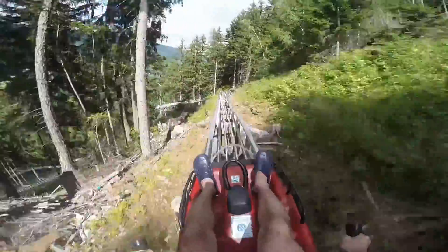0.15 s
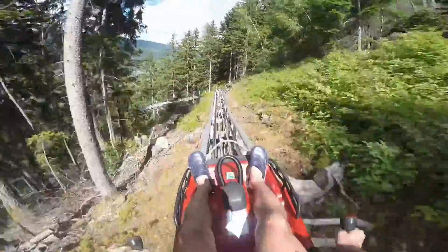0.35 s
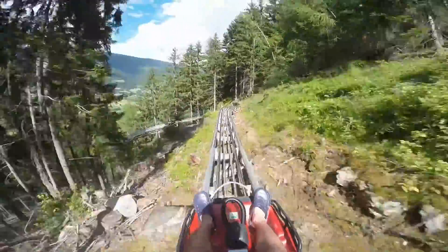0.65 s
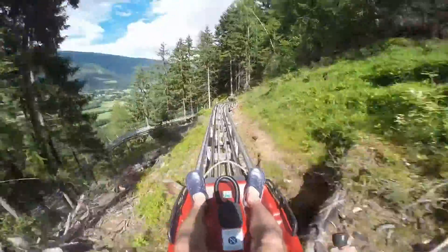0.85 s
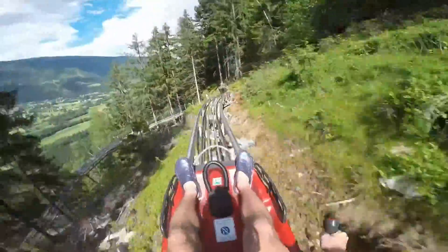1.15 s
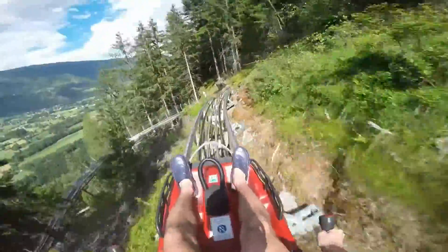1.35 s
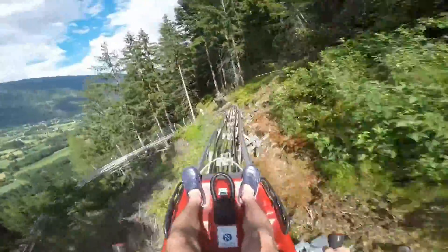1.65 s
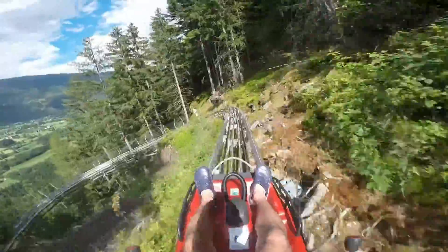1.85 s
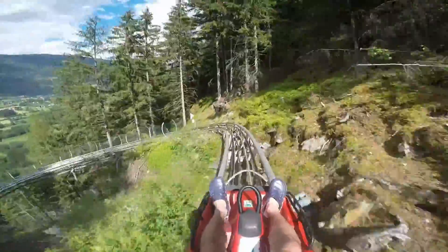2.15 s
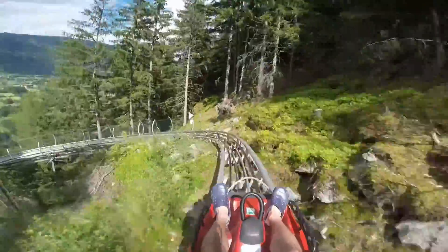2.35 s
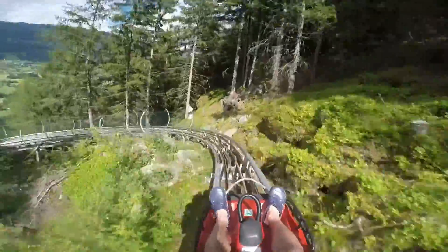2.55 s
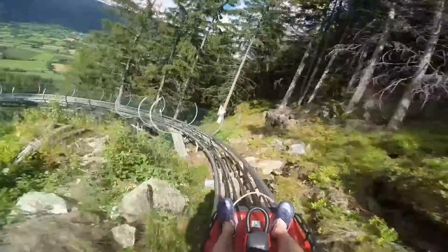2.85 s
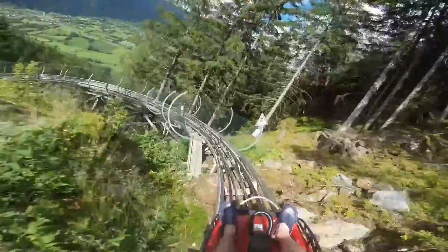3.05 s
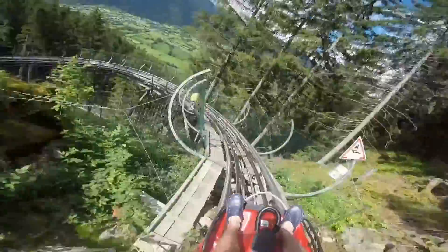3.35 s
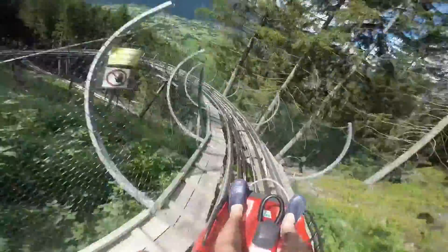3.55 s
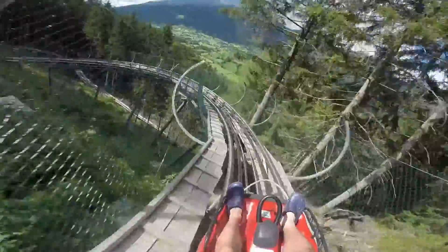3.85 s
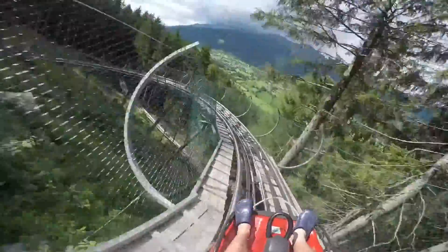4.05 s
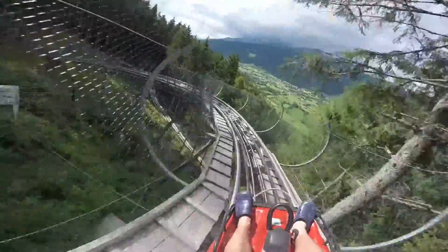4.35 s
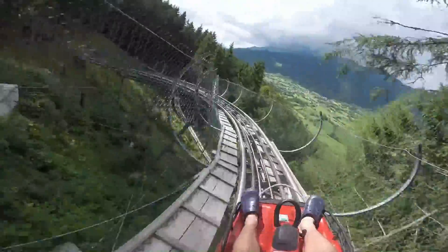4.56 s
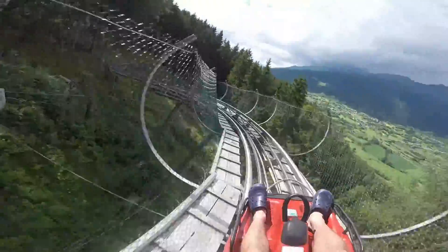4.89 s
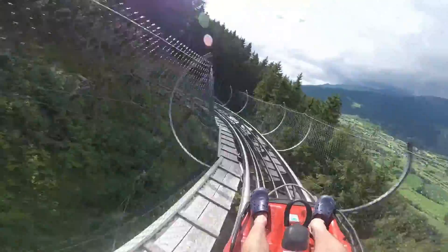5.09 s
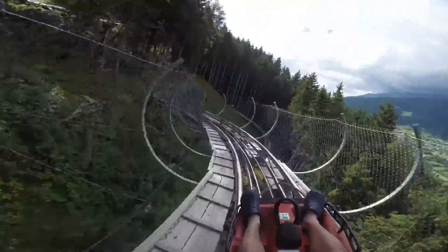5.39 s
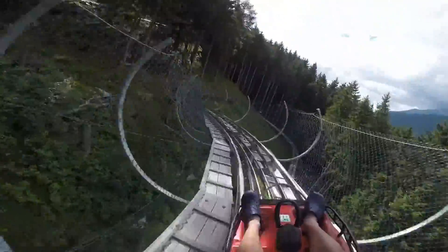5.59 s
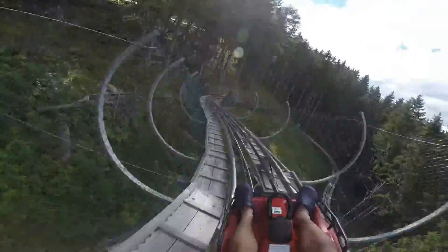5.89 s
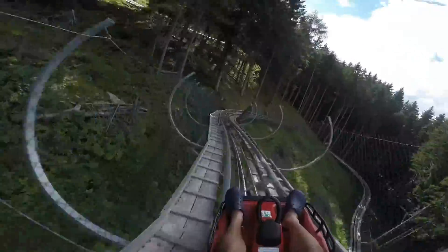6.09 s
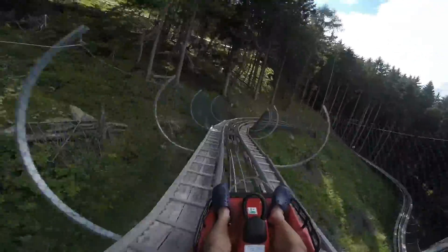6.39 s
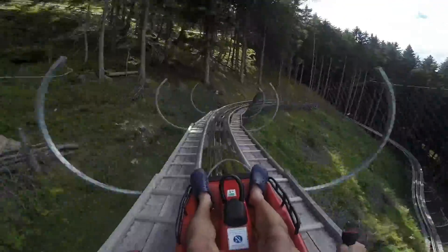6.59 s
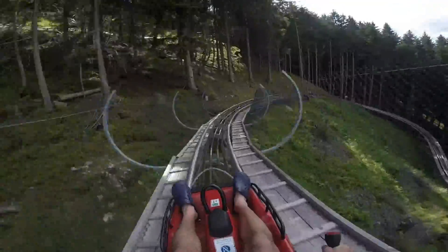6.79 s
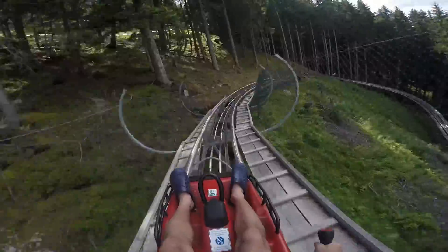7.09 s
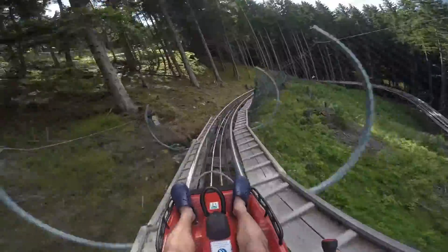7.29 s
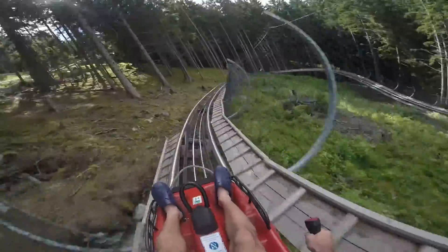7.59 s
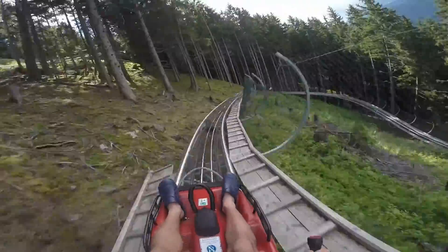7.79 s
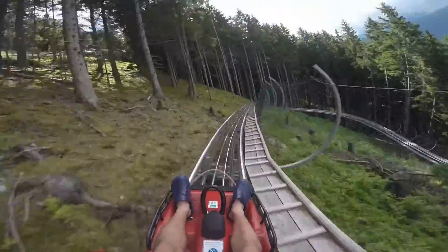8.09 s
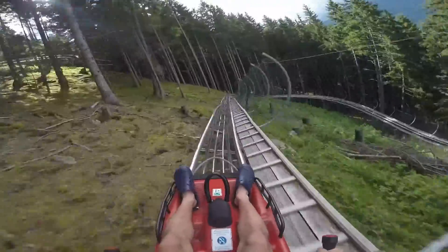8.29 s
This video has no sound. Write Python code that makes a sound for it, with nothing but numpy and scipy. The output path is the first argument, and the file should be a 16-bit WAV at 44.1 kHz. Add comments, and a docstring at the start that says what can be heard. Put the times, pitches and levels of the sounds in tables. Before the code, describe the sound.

Muffled onboard sound of a fast mountain coaster sled: steady gritty wheel roll, quick fluttering ticks, deep gusts thudding the case, scattered clacks and pings.

```python
"""Outdoors on a steel track, a sled rolls fast, heard by a small camera in a closed case on the rider.
Swelling low noise is wind on the case; the frame adds rumble, a drone and soft pushes for jolts.
The wheels are noise through resonances, with a tick each turn; knocks, pings and rattles are bursts
of noise. Squeaks and the camera's whine are sine tones, and faint clicks crackle in the treble."""
import sys
import numpy as np
from scipy import signal
from scipy.fft import rfft, irfft, next_fast_len
from scipy.io import wavfile
from scipy.ndimage import uniform_filter1d, minimum_filter1d, map_coordinates

SR = 44100
rng = np.random.default_rng(int(sys.argv[2]) if len(sys.argv) > 2 else 0)


def makeup_ratio(level_db):
    """Linear amplitude ratio for a level in decibels (20 dB per factor of ten)."""
    decades = np.asarray(level_db, float) / 20
    return 10 ** decades


def transcribe(u):
    """Save the signal u as a 16-bit wav file named by the first command-line argument.

    u: samples, shape (n,) or (channels, n), limited to [-1, 1]; the rate is SR.
    q: integer samples, one column per channel.
    """
    v = np.clip(np.atleast_2d(u).T, -1, 1)
    q = np.round(v * 32767).astype(np.int16)
    wavfile.write(sys.argv[1], SR, q)


N = 372204

# resonances of rail and case that colour rolling and knocks: centre_hz, width_hz, level_db
BODY_MODES = [(1234, 386, -1), (1660, 363, 2.5), (2400, 430, 0.5), (2990, 880, -6.5)]
# treble resonances that colour hiss, ticks and knocks: centre_hz, width_hz, level_db
BRIGHT_MODES = [(3450, 91, 6.5), (4370, 335, 5.5), (5810, 445, 6), (6780, 350, -2.5)]


def unit(x):
    """Scales a signal to rms 1."""
    return x / np.sqrt(np.mean(x ** 2) + 1e-20)


def curves(rows):
    """Draws straight lines between timed rows: one curve for each column after the time."""
    time_s, *columns = np.transpose(rows)
    return [np.interp(np.arange(N) / SR, time_s, column) for column in columns]


def wobble(rate):
    """A smooth random curve with rate knots a second."""
    knots = rng.standard_normal(int(N * rate / SR) + 4)
    return map_coordinates(knots, [np.arange(N) * rate / SR])


def follows(control_db, law):
    """The level of a layer that moves with a control."""
    over_db, share = law
    mean_db = control_db.mean()
    return mean_db + over_db + share * (control_db - mean_db)


def filtered(x, response):
    """Applies a complex response of frequency."""
    size = next_fast_len(len(x) + 8192)
    spectrum = rfft(x, size) * response(np.fft.rfftfreq(size, 1 / SR))
    return irfft(spectrum, size)[:len(x)]


def coloured(points, noise=None):
    """Shapes noise by a (Hz, dB) curve and scales it to rms 1."""
    point_hz, point_db = np.transpose(points)
    noise = rng.standard_normal(N) if noise is None else noise

    def response(hz):
        return makeup_ratio(np.interp(np.log(hz + 1), np.log(point_hz), point_db, left=-120, right=-120))

    return unit(filtered(noise, response))


def resonant(x, modes, top_hz):
    """Rings a sound through causal resonances; the case muffles what lies above top_hz."""
    def response(hz):
        ring = 0
        for k, (centre, width, db) in enumerate(modes):
            band = 1j * hz * width
            # neighbours alternate in sign
            ring = ring + (-1) ** k * makeup_ratio(db) * band / (centre * centre - hz * hz + band)
        return ring / (1 + 1.3j * hz / top_hz - (hz / top_hz) ** 2)

    return filtered(x, response)


def patchy(depth_db):
    """White noise with patches of random gain in time and frequency."""
    cells = signal.stft(rng.standard_normal(N + 512), nperseg=256)[2]
    field = uniform_filter1d(rng.standard_normal(cells.shape), 4, 0)  # across frequency
    field = uniform_filter1d(field, 6, 1)  # along time
    return signal.istft(cells * makeup_ratio(depth_db * unit(field)), nperseg=256)[1][:N]


def grainy(depth_db, size):
    """White noise whose level flickers in grains of about size samples."""
    flicker = unit(uniform_filter1d(rng.standard_normal(N), size))
    return rng.standard_normal(N) * makeup_ratio(depth_db * flicker)


def steady(x, share):
    """Evens out part of a narrow noise's own level swings."""
    envelope = np.abs(signal.hilbert(x, next_fast_len(N))[:N])
    return unit(x / (envelope + .4) ** share)


def swells(events):
    """A smooth hump of gain for each (centre s, half length s, peak dB)."""
    gain = np.zeros(N)
    for centre, half, db in events:
        i = np.arange(max(round((centre - half) * SR), 0), min(round((centre + half) * SR), N))
        gain[i] += makeup_ratio(db) * np.cos(np.pi / 2 * (i / SR - centre) / half) ** 2
    return gain


def struck(times, levels_db, t60):
    """An envelope that rises within milliseconds of each blow, then dies away by 60 dB in t60 s."""
    blows = np.bincount(np.round(times * SR).astype(int), makeup_ratio(levels_db), N)[:N]
    t = np.arange(SR // 20) / SR
    decay = makeup_ratio(-60 * t / t60) * (1 - np.exp(-t / 0.0024))
    return signal.fftconvolve(blows, decay)[:N]


def gusts():
    """Gains of deep and upper buffeting: thuds of wind added to a calmer flow."""
    # strongest thuds of wind on the case: centre_s, half_length_s, deep_db, upper_db
    thuds = [(0.116, 0.15, -22, -30), (0.26, 0.042, -31, -39), (0.47, 0.082, -47, -26.0),
             (0.871, 0.12, -15, -22.5), (1.099, 0.13, -15, -17.5), (1.36, 0.07, -15.5, -23),
             (1.619, 0.084, -17.5, -32.5), (1.742, 0.049, -17.5, -39), (1.885, 0.11, -20, -37.5),
             (2.22, 0.17, -28.5, -34), (2.423, 0.14, -18.1, -28), (2.72, 0.088, -23, -30.5),
             (2.85, 0.03, -26, -28), (2.946, 0.052, -24, -32), (3.145, 0.05, -35, -43),
             (3.322, 0.072, -15.5, -17.5), (3.578, 0.054, -11, -18), (3.801, 0.075, -46, -29),
             (4.003, 0.083, -18.5, -37.5), (4.102, 0.08, -30, -48), (4.687, 0.075, -22.6, -29.5),
             (5.22, 0.082, -25, -25.5), (5.487, 0.08, -44.5, -28.5), (5.668, 0.074, -28.5, -37),
             (5.858, 0.071, -31.5, -32.5), (6.021, 0.027, -44, -24.5), (6.325, 0.12, -16, -26.0),
             (6.525, 0.28, -33, -36.5), (6.807, 0.14, -27.5, -32), (6.949, 0.037, -18.5, -24.5),
             (7.244, 0.047, -19.5, -53.5), (7.573, 0.091, -12.5, -20), (7.938, 0.13, -20, -28),
             (8.201, 0.21, -19.5, -31)]
    # wind between thuds: time_s, deep_db, upper_db
    calm = [(0, -30, -33.5), (2, -31.5, -36), (3.9, -25, -28), (4.3, -34.5, -34.5), (5, -34.5, -29),
            (6.5, -27.5, -32.5), (8.3, -32, -33), (8.44, -38, -30.5)]
    upper_lead_s = 0.014  # the upper buffet peaks a little before the deep one
    deep_db, upper_db = curves(calm)
    deep = swells([(s, half, db) for s, half, db, _ in thuds]) + makeup_ratio(deep_db)
    upper = swells([(s - upper_lead_s, half, db) for s, half, _, db in thuds]) + makeup_ratio(upper_db)
    return deep, upper


def wind():
    """Gusts press on the case in slow lumps: two bands of low noise swell and wobble."""
    # colour of the deep buffeting: frequency_hz, relative_level_db (per Hz)
    deep_colour = [(8, -14), (17, -4), (25, 2.5), (34, -1.5), (44, -10), (60, -59)]
    # colour of the upper buffeting: frequency_hz, relative_level_db (per Hz)
    upper_colour = [(32, -42.5), (44, -0.5), (55, 4), (68, -10), (90, -18.5), (130, -29.5)]
    deep_gain, upper_gain = gusts()
    deep = steady(coloured(deep_colour), .9)
    upper = steady(coloured(upper_colour), .85)
    return deep_gain * makeup_ratio(1.47 * wobble(18)) * deep + upper_gain * makeup_ratio(2.05 * wobble(14)) * upper


def frame():
    """The frame rumbles, slightly more in strong gusts, and drones; each jolt is a soft rounded push."""
    # frame levels: time_s, rumble_db, seat_drone_db
    frame_levels = [(0.0, -39.5, -49), (0.42, -40.5, -50), (0.91, -37.5, -49), (1.13, -38.5, -50),
                    (3.22, -40, -50.5), (3.41, -41.5, -52.5), (3.71, -38.5, -48.5), (4.04, -41, -52.5),
                    (6.21, -42.5, -54), (6.44, -41.5, -53.5), (6.86, -41, -52.5), (8.44, -42.5, -51.5)]
    # colour of the rumble: frequency_hz, relative_level_db (per Hz)
    rumble_colour = [(55, -52.5), (75, -13.5), (91, -11.5), (130, -11), (160, -13.5), (210, -13.5),
                     (270, -25), (360, -31)]
    # colour of the seat drone: frequency_hz, relative_level_db (per Hz)
    drone_colour = [(220, -36.5), (290, -4.5), (400, -3), (515, -2.5), (590, -7), (720, -4.5), (850, -9),
                    (1100, -12)]
    # pushes of the frame: centre_s, peak_db, half_length_s, swing_back (radians per half length)
    jolts = [(3.161, -17, 0.0017, 1.54), (3.25, -18, 0.0022, 1.8), (3.281, -13.5, 0.0016, 1.07),
             (3.307, -1, 0.0061, 3), (3.601, -17, 0.0027, 3.05), (3.814, -20.5, 0.0017, 1.2),
             (3.968, -15, 0.0031, 3), (3.998, -13.5, 0.002, 0.98), (4.018, -13, 0.0018, 0.89),
             (6.288, -15.5, 0.0044, 1.9), (8.157, -27, 0.0018, 1.4)]
    rumble_db, drone_db = curves(frame_levels)
    gust_push = unit(gusts()[1] ** 0.074)
    rumble = makeup_ratio(rumble_db) * gust_push * coloured(rumble_colour)
    x = rumble + makeup_ratio(drone_db) * coloured(drone_colour, patchy(1.85))
    reach = SR // 40
    t = np.arange(-reach, reach) / SR
    for centre, db, half, swing in jolts:
        push = np.cos(swing * t / half) * np.exp(-(t / half) ** 2)
        x[round(centre * SR) - reach:][:len(t)] += makeup_ratio(db) * push
    return x


def wheels():
    """Rolling noise rings the rail's resonances; a flaw on one wheel ticks once a turn."""
    # wheel speed: time_s, turns_per_s
    wheel_speed = [(0.0, 24.97), (0.6, 26.11), (1.2, 26.67), (1.8, 26.44), (2.4, 26.59), (3.0, 25.09),
                   (3.6, 24.68), (4.2, 23.82), (4.8, 23.21), (5.4, 22.91), (6.0, 22.25), (6.6, 23.32),
                   (7.2, 23.53), (7.8, 24.86), (8.44, 24.69)]
    # controls that the layers follow: time_s, roll_db, upper_roll_db, treble_db, highest_treble_db
    load = [(0.0, -49, -47, -59.5, -75.5), (0.45, -48, -48, -57.5, -74.5), (0.75, -45.5, -45.5, -56.5, -69),
            (1.17, -47.5, -46, -58, -75.5), (1.83, -48, -46, -58, -74), (2.18, -47.5, -50, -58, -70),
            (2.47, -49.5, -49, -59, -70.5), (2.75, -44.5, -50, -55, -67.5),
            (2.87, -46.5, -52.5, -56.5, -68), (3.5, -47.5, -48.5, -59, -71), (3.71, -47.5, -54, -55, -68.5),
            (4.09, -49, -49.5, -59.5, -71.5), (4.54, -47.5, -48, -58.5, -73),
            (4.86, -50.5, -49.5, -59.5, -70.5), (5.26, -48.5, -48, -59.5, -71.5),
            (5.48, -53.5, -49.5, -61, -72), (5.78, -49, -53.5, -57.5, -69), (6.04, -51.5, -54.5, -61, -73),
            (6.65, -50, -52.5, -60.5, -73.5), (7.19, -51.5, -52.5, -60.5, -75.5),
            (7.62, -51, -53, -59.5, -78), (8.44, -51.5, -51.5, -61, -78)]
    # colour of the upper rolling band: frequency_hz, relative_level_db (per Hz)
    edge_colour = [(2100, -20.5), (2450, 4.5), (2750, 1), (3100, -2.5), (3500, -6.5), (3900, -7),
                   (4300, -18.5)]
    # colour of the highest treble: frequency_hz, relative_level_db (per Hz)
    fizz_colour = [(6200, -22), (7000, 2), (7800, 1), (9000, -6.5), (11000, -10), (13500, -9.5)]
    # each layer over its control: over_mean_db, share_of_swings
    roll_law = (1.9, 1.06)
    edge_law = (-3.5, 1.1)
    hiss_law = (-1, 1.7)
    fizz_law = (-0.9, 1.2)
    tick_law = (10.3, -0.27)
    load_db, upper_db, treble_db, top_db = curves(load)
    surge_db = 0.94 * wobble(9)  # shared by roll and hiss
    roll_db = follows(load_db, roll_law) + surge_db
    edge_db = follows(upper_db, edge_law) + 0.48 * wobble(5)
    hiss_db = follows(treble_db, hiss_law) + surge_db
    fizz_db = follows(top_db, fizz_law) + 0.84 * wobble(5)
    tick_db = follows(treble_db, tick_law) + 1.3 * wobble(4)

    turns = np.cumsum(curves(wheel_speed)[0]) / SR + .47  # starts part way through a turn
    at = np.flatnonzero(np.diff(np.floor(turns)))
    chance = rng.standard_normal((len(at), 2))  # small scatter of time and level
    times = np.clip(at / SR - .004 + 0.0017 * chance[:, 0], 0, None)
    beat = struck(times, tick_db[at] + 1.1 * chance[:, 1], t60=0.032)
    tick_noise = unit(resonant(patchy(3.8), BRIGHT_MODES, 6100))
    ticks = beat * (tick_noise + makeup_ratio(-14) * coloured(fizz_colour, patchy(3.5)))

    roll = makeup_ratio(roll_db) * unit(resonant(patchy(1.07), BODY_MODES, 3600))
    edge = makeup_ratio(edge_db) * coloured(edge_colour, patchy(2.2))
    hiss = makeup_ratio(hiss_db) * unit(resonant(patchy(2.13), BRIGHT_MODES, 9200))
    fizz = makeup_ratio(fizz_db) * coloured(fizz_colour, grainy(2.5, size=60))
    return roll + edge + hiss + ticks + fizz


def camera():
    """The electronics whine in thin, slightly wavering tones over a steady patchy hiss."""
    # whine tones: pitch_hz, level_db (rms before the waver)
    whine = [(8781, -84.5), (11569, -94), (11658, -94), (11688, -86), (11718, -83), (11748, -94),
             (14476, -99), (14625, -81.5), (14655, -92), (14685, -98)]
    # colour of the hiss: frequency_hz, relative_level_db (per Hz)
    hiss_colour = [(3000, -17), (7000, 0), (11000, -3), (14000, -6), (15200, -9.5)]
    t = np.arange(N) / SR
    tones = np.zeros(N)
    for hz, db in whine:
        waver = 1 + .15 * unit(uniform_filter1d(rng.standard_normal(N), 400))
        tones += np.sqrt(2) * makeup_ratio(db) * waver * np.sin(2 * np.pi * (hz * t + rng.random()))
    return tones + makeup_ratio(-74.5) * coloured(hiss_colour, patchy(2.8))


def crackle():
    """Faint thin clicks scatter at random: single-sample impulses kept to the highest treble."""
    # how thickly they fall: time_s, clicks_per_s
    click_rate = [(0, 3), (1.8, 4), (2.2, 12), (4.5, 9), (5, 22), (6.6, 16), (7.2, 6), (8.44, 4)]
    chance = rng.random((2, N))
    happens = chance[0] < curves(click_rate)[0] / SR
    clicks = happens * makeup_ratio(-58 - 3.8 * np.log(chance[1] + .05))  # a few are much louder
    return filtered(clicks, lambda hz: np.exp(-((hz - 10500) / 3500) ** 4))


def rattles():
    """Loose parts chatter briefly: a grainy burst with an extra share of the highest treble."""
    # short bright rattles: centre_s, half_length_s, level_db, brightness_db (treble over level)
    chatter = [(0.133, 0.025, -46, -22), (1.42, .03, -50, -17), (2.383, 0.019, -53, -7),
               (2.604, 0.036, -51, -14), (3.087, 0.037, -46, -19), (3.262, 0.025, -54, -8),
               (3.298, .025, -42.5, -19), (3.54, 0.049, -44.5, -18), (3.673, 0.022, -55, -10),
               (3.955, 0.019, -45.5, -17), (3.977, 0.056, -49.5, -15), (5.155, 0.03, -49, -14),
               (5.703, 0.026, -45, -16), (5.742, .02, -50, -13), (6.309, .02, -52, -12),
               (6.936, 0.021, -50, -15), (7.587, 0.06, -53.5, -14)]
    # colour of the extra treble: frequency_hz, relative_level_db (per Hz)
    shake_colour = [(6200, -30), (7000, 2), (8000, 0), (9500, -8.5), (11500, -12), (13500, -28)]
    modes = [(2360, 2400, 1.6), (4070, 2800, .5), (6200, 670, 0.28)]  # (Hz, width Hz, dB)
    wide = unit(resonant(grainy(1.7, size=40), modes, 5400))
    top = coloured(shake_colour, grainy(3.0, size=40))
    wide_gain = swells([(s, half, db) for s, half, db, _ in chatter])
    top_gain = swells([(s, half, db + bright) for s, half, db, bright in chatter])
    return wide_gain * wide + top_gain * top


def knocks():
    """Hard short contacts crack into the low, middle and treble resonances."""
    # contacts: start_s, low_peak_db, middle_db, treble_db (the last two: rms of the first 5 ms)
    contacts = [(1.596, -38, -40, -50.5), (3.0686, -33, -49, -61), (3.1338, -37, -48, -54),
                (3.218, -41, -58, -52), (3.263, -43, -42, -51), (3.2857, -25, -45, -60),
                (3.291, -32, -42, -60), (3.297, -35, -33.5, -58), (3.5985, -44, -40, -49),
                (3.697, -26, -51, -50), (3.701, -29, -38.5, -53), (3.7875, -27, -43, -52),
                (3.807, -32, -56, -60), (3.892, -37, -59, -68), (3.9448, -38, -38, -48),
                (4.0005, -30.5, -52, -57), (4.013, -39, -41, -60), (4.097, -46, -45, -55),
                (4.6464, -35, -66, -57), (5.7296, -30.5, -58, -53), (6.334, -31.5, -42.5, -59),
                (6.778, -36, -45, -69), (7.2457, -33, -59, -53), (7.5778, -28.5, -35.5, -47)]
    x, t = np.zeros(N), np.arange(SR // 20) / SR
    early = SR // 200  # the first moments set the loudness of the upper parts
    t60_s = np.array([[.008], [.025]])  # body, treble
    envelope = makeup_ratio(-60 * t / t60_s) * (1 - np.exp(-t / 0.00011))
    for start, low_db, mid_db, treble_db in contacts:
        body_crack, treble_crack = rng.standard_normal((2, len(t))) * envelope
        low = resonant(body_crack, BODY_MODES[:2], 2800)
        mid = resonant(body_crack, BODY_MODES[2:], 2000)
        high = resonant(treble_crack, BRIGHT_MODES, 4700)
        knock = makeup_ratio(low_db) * low / np.abs(low).max()
        knock -= makeup_ratio(mid_db) * mid / mid[:early].std()
        knock += makeup_ratio(treble_db) * high / high[:early].std()
        x[round(start * SR):][:len(t)] += knock
    return x


def pings():
    """Bright ticks that each ring one treble resonance clearly: short noise through two filters."""
    # ringing ticks: start_s, peak_db, pitch_hz
    ringing = [(1.854, -44, 4220), (2.0398, -47, 5660), (2.2287, -45, 5940), (2.3027, -45, 5700),
               (2.9078, -48, 4480), (3.1662, -47, 4280), (3.839, -46, 4100), (5.031, -49, 5560),
               (5.103, -45, 4540), (6.0447, -52, 4480), (6.6533, -50, 4670), (6.8892, -46, 5810),
               (6.9044, -47, 4400), (7.043, -52, 5750), (7.1681, -47.5, 4740), (7.2933, -51, 4570),
               (7.3776, -48, 4340), (7.422, -51, 4650), (7.5014, -52, 6000), (7.7035, -47, 4650),
               (8.0607, -42, 5670), (8.309, -48, 5500), (8.3896, -48, 5640)]
    x, t = np.zeros(N), np.arange(SR // 25) / SR
    envelope = makeup_ratio(-60 * t / 0.038) * (1 - np.exp(-t / 0.00084))
    for start, db, hz in ringing:
        ring = resonant(rng.standard_normal(len(t)) * envelope, [(hz, 300, .3)], 6500)
        ring = resonant(ring, [(hz, 900, .3)], 6500)
        x[round(start * SR):][:len(t)] += makeup_ratio(db) * ring / np.abs(ring).max()
    return x


def squeaks():
    """A rubbing part sings a thin, slightly unsteady note, heard by its overtones."""
    # notes: start_s, length_s, first_pitch_hz, last_pitch_hz, level_db (each overtone is relative to it)
    notes = [(2.872, 0.084, 3420, 3470, -75), (3.69, 0.078, 3400, 3400, -72), (6.18, .03, 3420, 3350, -80),
             (6.255, 0.077, 3350, 3440, -75), (6.32, .07, 3330, 3330, -76)]
    # overtones: multiple_of_pitch, relative_level_db
    overtones = [(2, 10), (3, -8), (4, -1)]
    x = np.zeros(N)
    for start, length, first_hz, last_hz, db in notes:
        n = round(length * SR)
        unsteady = 1 + .004 * unit(uniform_filter1d(rng.standard_normal(n), 150))
        hz = np.linspace(first_hz, last_hz, n) * unsteady
        phase = 2 * np.pi * np.cumsum(hz) / SR
        note = sum(makeup_ratio(db + rel) * np.sin(k * phase) for k, rel in overtones)
        x[round(start * SR):][:n] += signal.windows.tukey(n, .3) * note
    return x


def scene():
    """Adds all sources in one channel."""
    ride = wind() + frame() + wheels()
    contacts = knocks() + pings() + rattles() + squeaks()
    return (ride + contacts + crackle() + camera())[None]


def band_limit(x):
    """A steep low-pass at the top of the band."""
    return signal.sosfilt(signal.butter(12, 15700, fs=SR, output="sos"), x)


def record(dry):
    """A limiter with a smoothed gain holds back the biggest swings."""
    need = np.minimum(.74 / (np.abs(dry) + 1e-9), 1)
    gain = uniform_filter1d(minimum_filter1d(need, size=1601), size=801)  # sizes in samples
    return band_limit(dry * gain)


dry = scene()
out = record(dry)
transcribe(out)
```